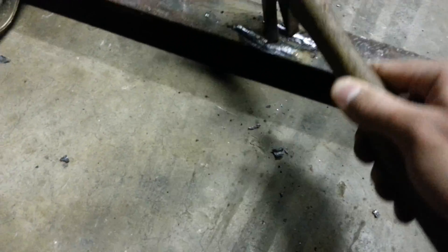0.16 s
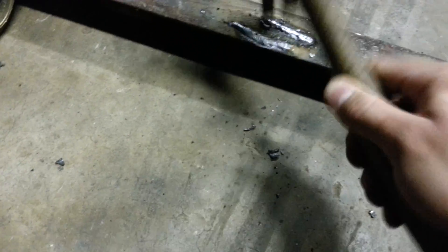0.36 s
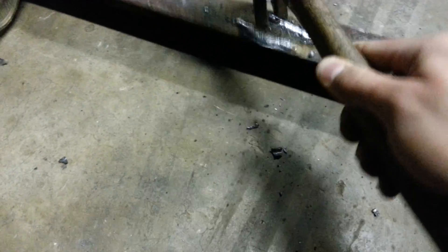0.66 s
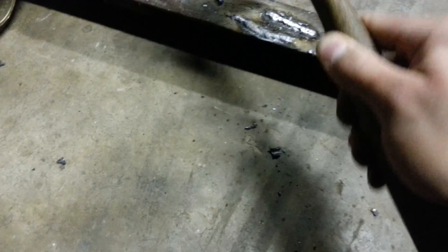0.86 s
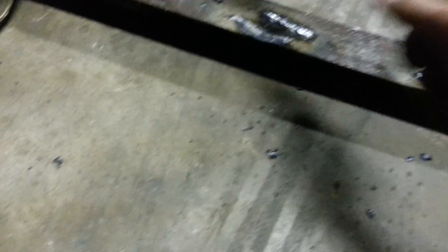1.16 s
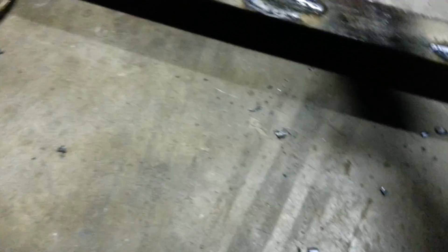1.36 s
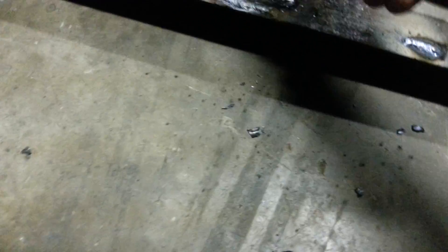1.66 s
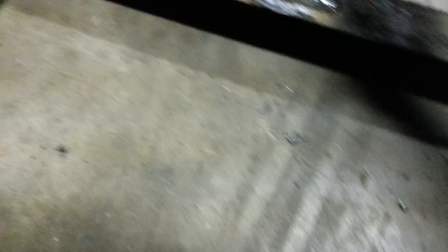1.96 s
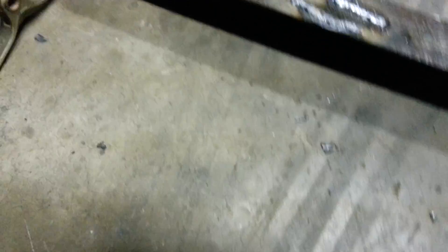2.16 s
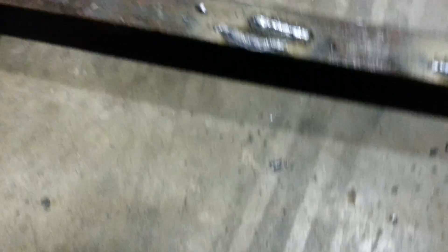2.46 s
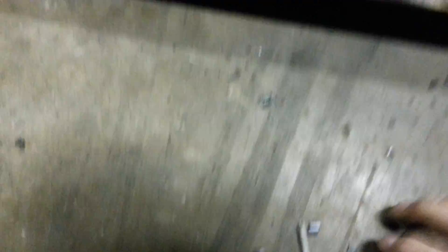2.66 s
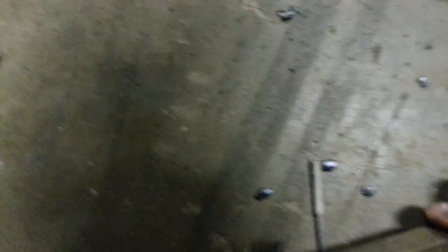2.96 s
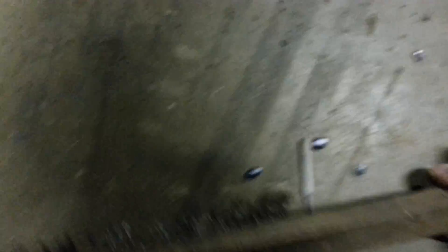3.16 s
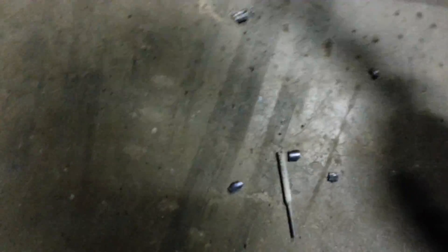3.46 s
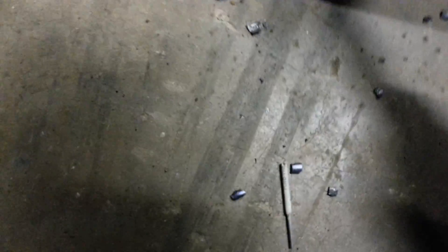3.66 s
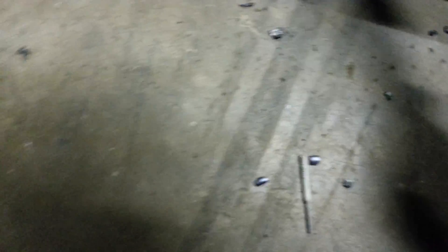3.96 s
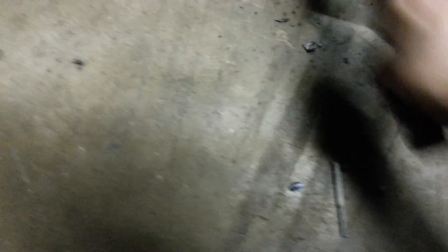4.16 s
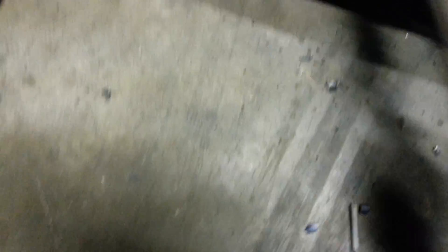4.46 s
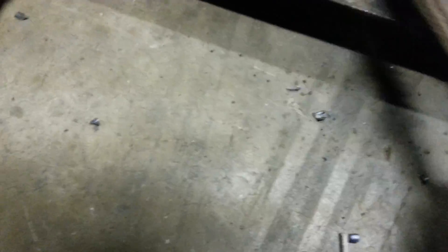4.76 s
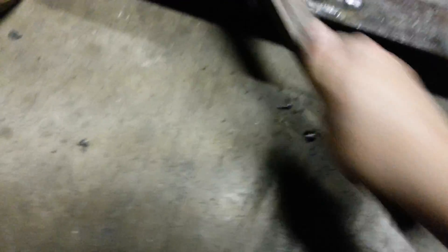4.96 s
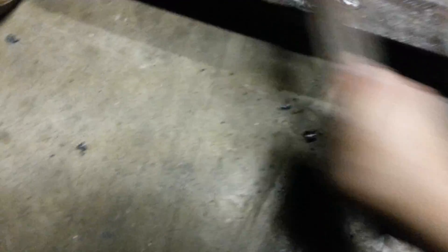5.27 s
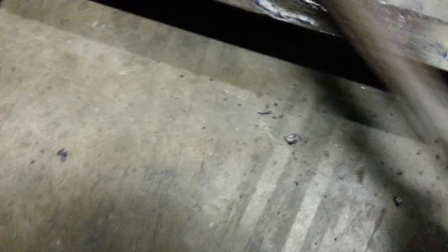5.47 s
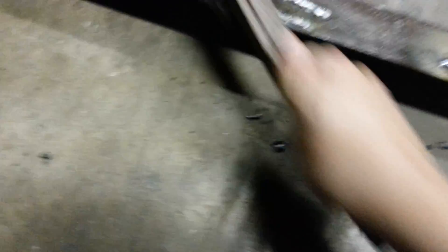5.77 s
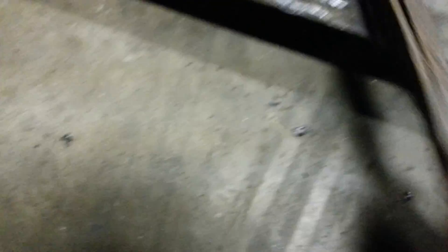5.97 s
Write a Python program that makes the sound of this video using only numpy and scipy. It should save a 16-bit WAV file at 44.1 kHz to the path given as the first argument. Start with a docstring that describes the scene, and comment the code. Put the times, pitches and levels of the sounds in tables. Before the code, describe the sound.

A close, live workshop with faint air and a dull distant wash. At the start the ring of an earlier hammer blow is still fading; further hard blows land at about 0.15, 0.4, 0.7 and 0.95 seconds, each a harsh, overloaded crack with a dense steel clang that decays into the room. Around 1.6 the hammer is laid on the frame and rocks with diminishing ticks until 1.9. Loose steel clinks from 2.25, then a bar bounces loudly at 2.5, quickening and weakening to rest by 2.9. At 3.0 a wooden brush back judders briefly across the bench with one knock. From 4.1 to the end, wire bristles scrub to and fro, about five strokes a second, hissing with a metallic singing edge. Fingers bump and slip on the left microphone, lightly near 4.0, strongly near 5.0 and 5.4.

```python
"""A hard, ringing workshop: a chipping hammer strikes slag off a weld on a steel frame, close enough to
overload the microphone. The hammer is put down and settles, loose steel clinks and a bar bounces to rest; a
wire brush is dragged off the bench and scrubs the bead to and fro while fingers bump the left microphone.
Steel is sums of decaying modes with noise bursts for the contacts; rubbing is coloured noise shaped by the
motion of the hand; a diffuse noise tail is the room, and steady air and a dull far wash lie behind."""
import sys
import numpy as np
from scipy import signal
from scipy.fft import rfft, irfft, next_fast_len
from scipy.io import wavfile
from scipy.ndimage import uniform_filter1d

SR = 44100
rng = np.random.default_rng(int(sys.argv[2]) if len(sys.argv) > 2 else 0)


def write(x):
    x = np.atleast_2d(x).T
    wavfile.write(sys.argv[1], SR, np.round(np.clip(x, -1, 1) * 32767).astype(np.int16))


N = 269892
TIME = np.arange(N) / SR
RING_TIME = TIME[:SR]  # every ring and tail lasts at most one second

# Workshop air. Each row: frequency in Hz, relative level in dB per Hz.
AIR_SPECTRUM = [(29, -44.5), (50, -23.5), (87, -5), (200, -5), (225, -8), (299, -8.5), (418, -17),
                (570, -13), (759, -14.5), (2820, -20), (6660, -31.5), (12400, -30), (15000, -35)]
AIR_DB = -51
# A dull wash far back in the shop. Each row: frequency in Hz, relative level in dB per Hz.
WASH_SPECTRUM = [(70, -26), (180, -3), (500, 1.5), (900, 0), (1500, -7), (3000, -16.5), (6000, -35.5)]
WASH_DB, WASH_ENDS_S, WASH_RELEASE_DB_PER_S = -44, 3, 38

# Wood rubbing on the bench. Each row: frequency in Hz, relative level in dB.
DRAG_SPECTRUM = [(59, -57), (100, -12.5), (297, -7), (500, 2), (748, -4), (1430, 0), (1880, -14),
                 (2320, -11.5), (4450, -19.5), (6090, -33), (9860, -28), (15000, -41)]
# The wooden brush slides off the bench in one pull that eases as it goes; its back taps once on the way.
DRAG_S, DRAG_DB, DRAG_ATTACK_S, DRAG_HOLD_S = 2.992, -22, 0.052, 0.14
DRAG_EASE_DB_PER_S, DRAG_RELEASE_DB_PER_S = 22.5, 220
TAP_S, TAP_DB = 3.078, -8.5

# Brush strokes, away and back in turn, each lasting until the next.
# Each row: start in seconds, level at mid-stroke in dB.
STROKES = [(4.068, -29), (4.272, -30), (4.443, -28), (4.633, -29), (4.832, -27.5), (5.018, -28),
           (5.214, -27), (5.408, -28), (5.606, -27.5), (5.802, -29.5), (6.005, -25)]
LAST_STROKE_S = 0.22
STALL_DB, SPEED_POWER = -16.5, 0.77  # rustle left at each turn; loudness goes with this power of the speed
LEAN_DB = 3  # pressure grows by this much along a stroke away, and eases along a stroke back
# Hiss of the bristles. Each row: frequency in Hz, relative level in dB.
BRISTLE_SPECTRUM = [(120, -50), (200, -9), (219, -80), (375, -30), (517, -13.5), (740, -20), (1160, -7.5),
                    (1270, -15), (1690, -16), (3780, -4), (5710, -14), (12600, -12.5), (14500, -20)]
# Frame modes sung under the brush. Each row: frequency in Hz, width in Hz, relative level in dB.
RUBBED_MODES = [(165, 45, -13), (530, 35, -14), (661, 14, -17), (1060, 25, -12), (1172, 22, -.5),
                (1600, 25, -15), (1830, 30, -9), (2020, 22, -8), (2290, 50, -5), (3148, 20, -9),
                (3680, 30, -4), (3755, 25, 4), (4340, 160, 0)]
# Bristle tufts catching on the steel. Each row: start in seconds, level in dB.
SNAGS = [(3.789, -46), (4.034, -34.5), (4.568, -17.5), (4.67, -24.5), (5.323, -32)]

# Loose steel touching down.
# Each row: start in seconds, ring in dB, knock in dB, frequency in Hz that the contact point favours.
CLINKS = [(2.247, -14.5, -4.5, 5760), (2.2989, -13, -8, 2704), (2.301, -23.5, -30, 7350),
          (2.329, -26, -13, 4950), (2.346, -14.5, -31.5, 1453), (2.413, -25, -39, 4340),
          (2.435, -26.5, -36.5, 7400), (2.49, -32.5, -32, 4930)]
# Modes of the loose steel. Each row: frequency in Hz, relative level in dB, t60 in seconds.
ROD_MODES = [(1453, -3, .32), (2660, 15, .026), (2740, 11, .03), (3390, -2, .15), (4436, -6, .14),
             (4880, 0, .09), (4970, -1, .1), (6045, 3, .13), (7332, -8, .28), (7364, -11, .28),
             (9530, -26, .35), (14200, -28, .7), (14340, -27, .7), (14470, -29, .7)]
# Dull knock on the bench. Each row: frequency in Hz, relative level in dB.
KNOCK_SPECTRUM = [(60, -16.5), (400, 14), (1000, 12.5), (2000, 10), (4300, 4.5), (6500, -20.5),
                  (10000, -57.5), (15000, -78.5)]

# A steel bar bouncing to rest. Each row: start in seconds, ring in dB, knock in dB.
BOUNCES = [(2.5196, -2.5, 7), (2.679, -3.5, 6.5), (2.7719, -9, 1), (2.829, -19, -5), (2.8675, -20, -10.5)]
# Modes of the bar. Each row: frequency in Hz, relative level in dB, t60 in seconds.
BAR_MODES = [(1470, -13, .3), (2706, 3, .35), (2722, 6, .42), (2740, 9, .07), (2918, -7, .2),
             (3747, -9, .25), (3930, -5, .35), (4060, -7, .35), (4190, -7, .3), (4350, -4, .35),
             (4651, -10, .3), (4896, 0, .28), (4912, 0, .28), (4940, 6, .07), (7000, -17, .25),
             (7350, -15, .22), (8620, -17, .22)]
# Knock of the bar. Each row: frequency in Hz, relative level in dB.
BAR_KNOCK_SPECTRUM = [(60, -29.5), (450, -14.5), (1800, -14), (2450, -5), (2750, 10), (3400, -5),
                      (4800, -1), (6500, -17.5), (10000, -24), (15000, -46)]
# Clatter of steel on steel. Each row: frequency in Hz, relative level in dB.
CLATTER_SPECTRUM = [(300, -26), (2000, -19), (2560, -20), (2800, -5), (3300, -5), (4200, 0), (5400, -13),
                    (6100, -19), (7000, -14), (7900, -25), (9500, -24), (15000, -34)]
CLATTER_DB, CLATTER_LOSS_DB = -7.5, 7.5  # at the first bounce, and the loss with each further one

# The hammer rocks and settles. Each row: start in seconds, level in dB.
ROCKS = [(1.646, -22), (1.754, -32), (1.791, -38), (1.849, -42.5), (1.905, -44)]
# The hammer's own ring. Each row: frequency in Hz, relative level in dB, t60 in seconds.
HAMMER_MODES = [(2490, -4.5, .3), (3300, -3.5, 0.18), (3354, -2, .18), (4430, -7.5, 0.119),
                (4950, -6, 0.091), (5060, -6.5, .1), (6800, -13, 0.093), (8600, -12, .08)]

# Fingers knock the left microphone. Each row: start in seconds, thump level in dB, frequency in Hz.
BUMPS = [(4.025, -20, 231), (4.99, -6.5, 794), (5.042, -5, 240), (5.382, -7, 450), (5.3873, -2, 253),
         (5.415, -3, 450), (5.468, -12, 312)]
# The grip shifts in runs of small slips. Each row: start in seconds, length in seconds, first slip in dB.
GRIPS = [(3.901, .04, -34.5), (4.032, .13, -20.5), (4.991, .04, -9), (5.012, .08, -19.5), (5.418, .12, -13)]
SLIP_HZ, SLIPS_PER_S, SLIP_FADE_DB_PER_S = 207, 65, 68

# Hammer blows on the weld; the first falls before time zero, so only its ring is heard.
# Each row: start in seconds, level in dB, relative crack level in dB, crack t60 in seconds.
BLOWS = [(-.115, -2, 0.5, 0.1), (0.1515, -1.5, 0, 0.12), (0.4096, -1.5, -3, 0.18), (.6818, 1, -4.5, 0.19),
         (.947, -0.5, 1.5, .12)]
BLOW_TOP_HZ = 11500  # the hard tip passes little above this to the frame
# The hammer is laid on the frame: a duller contact, mostly crack.
LAID_S, LAID_DB, LAID_CRACK_DB, LAID_T60_S, LAID_TOP_HZ = 1.6253, -18, 15, 0.069, 2800
# Strong modes of the welded frame, before a slight extra decay.
# Each row: frequency in Hz, relative level in dB, t60 in seconds.
FRAME_MODES = [(661, -15, .7), (715, -14, .6), (1071, -9, .45), (1138, -11, .4), (1239, -6, .45),
               (1275, -3, .6), (1300, -1, .65), (1322, -1, .65), (1365, -4, .55), (1398, -8, .5),
               (1572, -10, .45), (1716, -9, .55), (1971, -4, .55), (2003, -8, .55), (2037, -2, .5),
               (2102, -10, .6), (2453, -3, .5), (2720, -4, .5), (3087, -10, .45), (3175, -6, .55),
               (3310, -6, .5), (3620, -5, .5), (3690, -6, .5), (3730, -7, .5), (3970, -10, .45),
               (4358, -13, .5), (4660, -17, .5), (4970, -16, .55), (5770, -22, .45), (6832, -22, .4)]
# The frame's many weak modes. Each row: frequency in Hz, relative level in dB.
WEAK_SPECTRUM = [(300, -21), (800, -4.5), (1300, 3.5), (2500, 3), (4200, -2), (5500, -19.5), (8500, -12.5),
                 (11500, -13.5), (14500, -30)]
# The crack of contact. Each row: frequency in Hz, relative level in dB.
CRACK_SPECTRUM = [(60, -24), (300, -16.5), (750, -13.5), (1250, 0.5), (1800, -9), (3500, -9), (6000, -19),
                  (10000, -23.5), (15000, -27.5)]

# The left port resonates in the upper middle. Each row: frequency in Hz, left minus right in dB.
PORT_BALANCE = [(100, -0.5), (380, 1.5), (750, 1), (1290, 0), (2380, 4), (4390, 11.5), (8100, 2),
                (14000, 0)]
TOP_HZ = 15100  # nothing is heard above this frequency


def undb(db):
    """Decibels to gain."""
    return 10 ** (np.asarray(db) / 20)


def unit(x):
    """Scale to rms 1."""
    return x / np.sqrt(np.mean(x ** 2))


def gain_at(hz, spectrum):
    """Gain of a (Hz, dB) spectrum at the given frequencies."""
    f, db = np.transpose(spectrum)
    return undb(np.interp(np.log(hz + 1), np.log(f), db))


def colour(x, spectrum):
    """Give a signal a spectrum; rms 1."""
    length = x.shape[-1]
    size = next_fast_len(length)
    gains = gain_at(np.fft.rfftfreq(size, 1 / SR), spectrum)
    return unit(irfft(rfft(x, size) * gains, size)[..., :length])


def ports(x, alike_hz):
    """Two unrelated signals as two microphones hear them: alike in the bass, apart in the treble."""
    treble = signal.butter(1, alike_hz, "high", fs=SR, output="sos")
    side = signal.sosfilt(treble, x[1])
    return np.array([x[0] + side, x[0] - side])


def noise(spectrum, size):
    """Coloured stereo noise; rms 1."""
    return colour(ports(rng.standard_normal((2, size)), alike_hz=710), spectrum)


def pan(db):
    """Left and right gains for a level difference, left minus right."""
    return undb(np.array([[1], [-1]]) * db / 2)


def wander(rate):
    """Slow chance that turns about rate times a second; rms about 1."""
    points = rng.standard_normal(N // 100)
    # the straight lines between points lower the rms, 1.2 restores it
    return 1.2 * np.interp(TIME * rate, np.arange(len(points)), points)


def fade(t60):
    """Exponential decay by 60 dB in t60 seconds."""
    return np.exp(-np.log(1000) * RING_TIME / t60)


def burst(spectrum, t60, contact_s=0.00045):
    """Modes too dense to tell apart, building up during contact and dying together."""
    return noise(spectrum, size=SR) * fade(t60) * np.clip(RING_TIME / contact_s, 0, 1)


def partials(modes):
    """One decaying complex sine for each mode, total starting power 1."""
    hz, db, t60 = np.transpose(modes)
    poles = (2j * np.pi * hz - np.log(1000) / t60).astype(np.complex64)
    gains = undb(db) * np.sqrt(2 / np.sum(undb(db) ** 2))
    return gains.astype(np.float32)[:, None] * np.exp(poles[:, None] * RING_TIME.astype(np.float32))


def strike(waves, weight=1):
    """Each contact point shares the energy differently among the modes; each port hears its own mixture."""
    shape = (2, len(waves))
    scatter = undb(2 * rng.standard_normal(shape))
    gains = weight * scatter * np.exp(2j * np.pi * rng.random(shape))
    contact = np.clip(RING_TIME / 0.00083, 0, 1)  # the modes build up while the steel is in contact
    return (gains.astype(np.complex64) @ waves).imag * contact


def friction(spread_db):
    """Dense tiny slips of uneven size."""
    size_db = spread_db * np.minimum(rng.exponential(size=N), 5)
    return rng.standard_normal((2, N)) * undb(size_db)


def add(out, s, sound):
    """Mix a sound in at time s."""
    start = int(s * SR)
    first, last = max(start, 0), min(start + sound.shape[-1], N)
    out[:, first:last] += sound[:, first - start:last - start]


def background():
    """Steady air, and a dull distant wash that wavers a little and dies away."""
    past_end_s = np.maximum(TIME - WASH_ENDS_S, 0)
    wash_db = WASH_DB - WASH_RELEASE_DB_PER_S * past_end_s + 0.8 * wander(rate=6.4)
    air = noise(AIR_SPECTRUM, size=N) * undb(AIR_DB)
    return air + noise(WASH_SPECTRUM, size=N) * undb(wash_db)


def workshop(x, wet_db, low_t60=1.49, high_t60=0.5):
    """A sound with its room: concrete and steel return a diffuse tail in which the lows stay longest."""
    low = burst([(60, -5.0), (300, 5.0), (800, 0.0), (1400, -25.5), (4000, -36), (15000, -57.5)], low_t60)
    high = burst([(300, -4.5), (1500, 0.5), (4000, 0), (7000, -7.5), (15000, -15.5)], high_t60)
    tail = (undb(-15.5) * low + high) * np.clip(RING_TIME / 0.018, 0, 1)
    direct = RING_TIME == 0
    response = undb(wet_db) * unit(tail) / np.sqrt(SR) + direct
    return signal.fftconvolve(x, response, axes=1)[:, :N]


def drag():
    """The brush's wooden back judders over the bench, its slips fading as the pull eases, and taps once."""
    age = TIME - DRAG_S
    lifted = np.maximum(age - DRAG_ATTACK_S - DRAG_HOLD_S, 0)
    pull_db = DRAG_DB - DRAG_EASE_DB_PER_S * age - DRAG_RELEASE_DB_PER_S * lifted
    pull = np.clip(age / DRAG_ATTACK_S, 0, 1) * undb(pull_db)
    judder = undb(1.9 * wander(rate=21))
    out = colour(ports(friction(spread_db=1.5), alike_hz=900), DRAG_SPECTRUM) * judder * pull
    add(out, TAP_S, undb(TAP_DB) * burst(KNOCK_SPECTRUM, t60=0.016))
    return out


def scrubbing(touch_s=0.017):
    """The arm swings to and fro: speed is half a sine in each stroke, pressure is greatest at the far end."""
    starts, db = np.transpose(STROKES)
    turns = np.append(starts, starts[-1] + LAST_STROKE_S)
    count = np.arange(len(turns))
    swing = np.interp(TIME, turns, count)  # strokes done so far; it holds after the last turn
    speed = np.abs(np.sin(np.pi * swing))
    pressure_db = np.interp(swing, count[:-1] + 0.5, db) - LEAN_DB / 2 * np.cos(np.pi * swing)
    touch = np.clip((TIME - starts[0]) / touch_s, 0, 1)
    return touch * undb(pressure_db) * np.hypot(speed ** SPEED_POWER, undb(STALL_DB))


def brush(hiss_db=5.0, ring_db=0.0):
    """Wire tips flick over the bead as noise, stall at each turn and keep the frame's resonances singing."""
    chatter_db = 0.67 * wander(rate=140)  # tufts catch and let go
    motion = scrubbing() * undb(chatter_db)
    hiss = colour(friction(spread_db=2.0), BRISTLE_SPECTRUM) * motion
    push = unit(friction(spread_db=3.0)) * motion
    song = 0
    for hz, width, db in RUBBED_MODES:
        # the brush travels over nodes and bellies, so each mode comes and goes
        mode_db = db + 2.8 * wander(rate=6.4)
        # a narrow resonance passes less noise: make up for its width
        gain = undb(mode_db) * np.sqrt(SR / 2 / width / len(RUBBED_MODES))
        song = song + signal.lfilter(*signal.iirpeak(hz, hz / width, fs=SR), push * gain)
    out = undb(hiss_db) * hiss + undb(ring_db) * song
    for s, db in SNAGS:
        add(out, s, undb(db) * burst(CLATTER_SPECTRUM, t60=0.11))
    return out * pan(db=-1.7)


def clinks():
    """A light piece of steel touches down several times; each contact point favours modes near one pitch."""
    out, rod = np.zeros((2, N)), partials(ROD_MODES)
    mode_hz = np.array(ROD_MODES)[:, 0]
    for s, ring_db, knock_db, favoured_hz in CLINKS:
        distance = np.log(mode_hz / favoured_hz) / 0.18
        weight = 0.65 + 4.2 * np.exp(-distance ** 2)
        # a short knock and a faint longer rumble
        knock = burst(KNOCK_SPECTRUM, t60=0.035) + undb(-17.5) * burst(KNOCK_SPECTRUM, t60=0.45)
        add(out, s, undb(ring_db) * strike(rod, weight) + undb(knock_db) * knock)
    return out


def bounces(bench_db=-42):
    """A heavier bar bounces ever faster and softer; the steel under it clatters, the bench rumbles on."""
    out, bar = np.zeros((2, N)), partials(BAR_MODES)
    for k, (s, ring_db, knock_db) in enumerate(BOUNCES):
        clatter = undb(CLATTER_DB - k * CLATTER_LOSS_DB) * burst(CLATTER_SPECTRUM, t60=0.44)
        ring = undb(ring_db) * strike(bar) + clatter
        rumble = undb(bench_db) * burst(KNOCK_SPECTRUM, t60=1.3)
        knock = burst(BAR_KNOCK_SPECTRUM, t60=0.044) + rumble
        add(out, s, pan(db=1.0) * (ring + undb(knock_db) * knock))
    return out


def slips(scatter_db=1.0, scatter_octaves=0.48):
    """Small uneven slips of a shifting grip that die away, as rows (s, thump dB, Hz)."""
    rows = []
    for start, length, db in GRIPS:
        late, loud, high = rng.standard_normal((16, 3)).clip(-1.5, 1.5).T
        age = np.abs(np.arange(len(late)) + late / 4) / SLIPS_PER_S
        slip_db = db - SLIP_FADE_DB_PER_S * age + scatter_db * loud
        slip_hz = SLIP_HZ * 2 ** (scatter_octaves * high)
        run = np.c_[start + age, slip_db, slip_hz]
        rows += list(run[age < length])
    return rows


def fingers(cycles=0.38, rub_db=-17):
    """Skin slips on the case: a thump gone in two or three cycles and a short rub, almost only at left."""
    out = np.zeros((2, N))
    for s, db, hz in BUMPS + slips():
        age = RING_TIME * hz / cycles  # the swell is fullest after this part of a cycle
        thump = age * np.exp(1 - age) * np.sin(2 * np.pi * hz * RING_TIME)
        rub = burst([(40, -5), (120, -0.5), (450, 1.0), (900, -23.5), (2500, -33), (9000, -70)], t60=0.081)
        add(out, s, undb(db) * (thump + undb(rub_db) * rub) * undb([[0], [-28]]))
    return out


def settling(tick_db=-3):
    """The hammer rocks on the frame, each contact a tick of noise and a faint ring of its own modes."""
    out, modes = np.zeros((2, N)), partials(HAMMER_MODES)
    for s, db in ROCKS:
        tick = undb(tick_db) * burst(CLATTER_SPECTRUM, t60=0.095)
        add(out, s, undb(db) * (strike(modes) + tick))
    return out


def weak_modes(count=220, t60_at_2khz=0.56):
    """A crowd of weak frame modes, evenly spread in pitch but for some scatter; high ones die sooner."""
    hz = np.geomspace(300, 14000, count) * (1 + 0.007 * rng.standard_normal(count))
    uneven_db = np.interp(hz, [4000, 8000], [3, 8]) * rng.standard_normal(count).clip(-2, 1.5)
    db = 20 * np.log10(gain_at(hz, WEAK_SPECTRUM)) + uneven_db
    return partials(np.c_[hz, db, t60_at_2khz * (hz / 2000) ** -0.16])


def hammer(weak_db=-11, ring_db=-4.0, crack_db=10):
    """Each blow cracks, then leaves the frame's strong modes and a crowd of weak ones ringing."""
    out, weak, strong = np.zeros((2, N)), weak_modes(), partials(FRAME_MODES)
    contacts = [(*blow, BLOW_TOP_HZ) for blow in BLOWS]
    contacts.append((LAID_S, LAID_DB, LAID_CRACK_DB, LAID_T60_S, LAID_TOP_HZ))
    for s, db, contact_db, crack_t60, top_hz in contacts:
        ring = undb(ring_db) * strike(strong) + undb(weak_db) * strike(weak)
        shortened = ring * fade(t60=5.0)  # a slight extra decay shortens every ring a little
        crack = undb(crack_db + contact_db) * burst(CRACK_SPECTRUM, crack_t60)
        softness = signal.butter(2, top_hz, fs=SR, output="sos")
        blow = undb(db) * signal.sosfilt(softness, shortened + crack)
        add(out, s, workshop(blow, wet_db=-17.5))
    return out


def scene():
    """The shop's background, the sources in the room with their own share of it, and the fingers dry."""
    loose_steel = workshop(clinks() + settling(), wet_db=-19.5) + workshop(bounces(), wet_db=-17)
    brushing = workshop(drag() + brush(), wet_db=-23.5)
    return background() + brushing + loose_steel + fingers() + hammer()


def record(dry):
    """The two ports colour the sound differently; the input clips hard when loud; rumble and top are cut."""
    size = next_fast_len(N + SR // 10)
    ratio = gain_at(np.fft.rfftfreq(size, 1 / SR), PORT_BALANCE)
    # left and right share a constant power at every frequency
    gains = np.array([ratio, np.ones_like(ratio)]) * np.sqrt(2 / (1 + ratio ** 2))
    heard = irfft(rfft(dry, size) * gains, size)[:, :N]
    loudness = uniform_filter1d(np.abs(heard).clip(0, 4), size=220)  # over 5 ms
    bias = 0.1 * loudness ** 2 / 4  # overload pushes the input off centre
    clipped = np.clip(heard + bias, -0.98, 0.98)
    rumble_cut = signal.butter(2, 35, "high", fs=SR, output="sos")
    top_cut = signal.ellip(8, 0.2, 70, TOP_HZ, fs=SR, output="sos")
    return signal.sosfilt(top_cut, signal.sosfilt(rumble_cut, clipped))


dry = scene()
out = record(dry)
write(out)
```